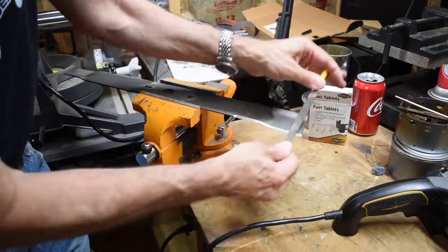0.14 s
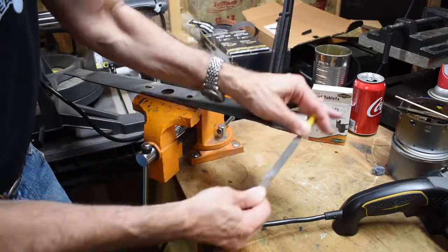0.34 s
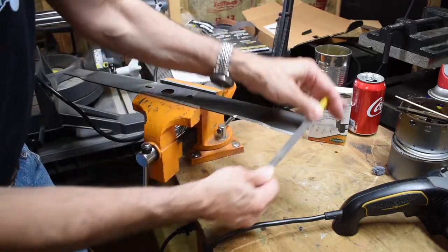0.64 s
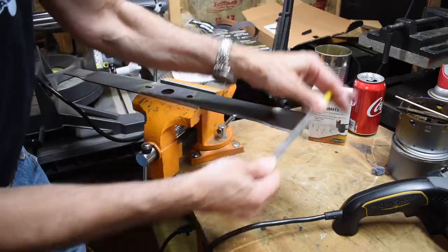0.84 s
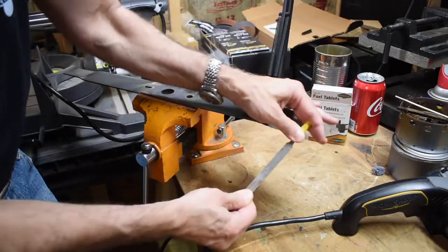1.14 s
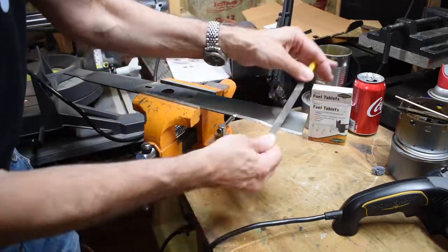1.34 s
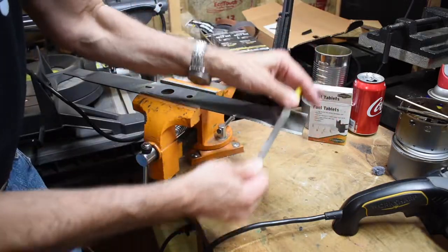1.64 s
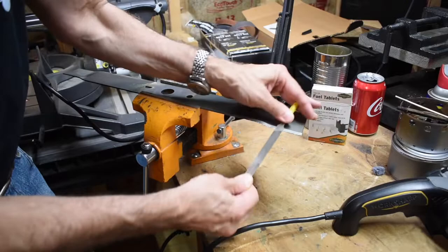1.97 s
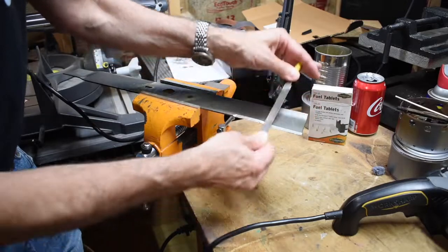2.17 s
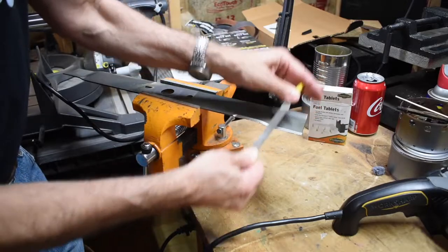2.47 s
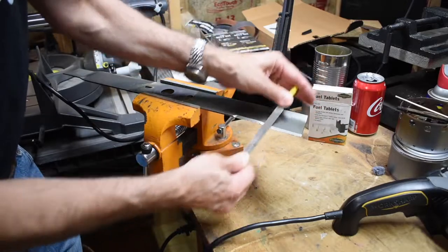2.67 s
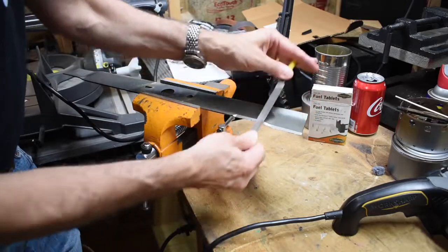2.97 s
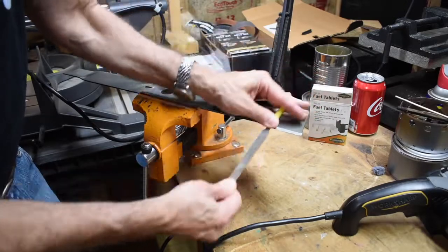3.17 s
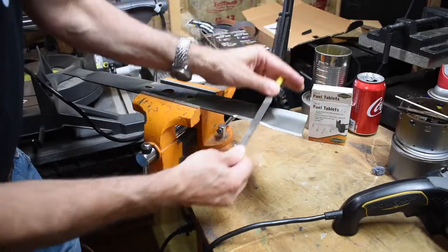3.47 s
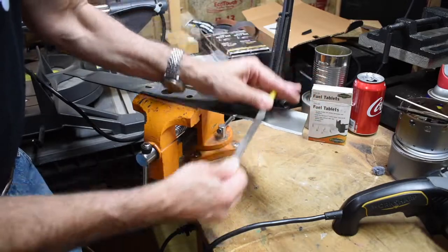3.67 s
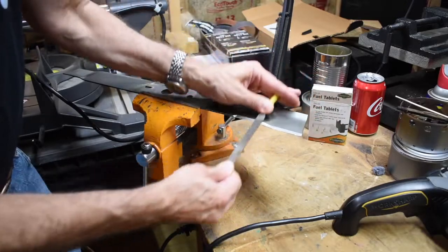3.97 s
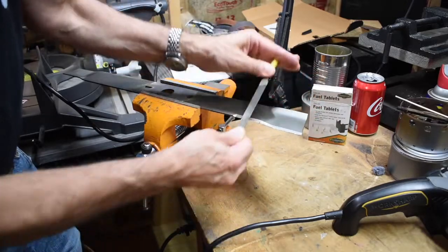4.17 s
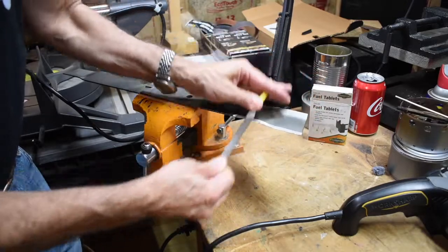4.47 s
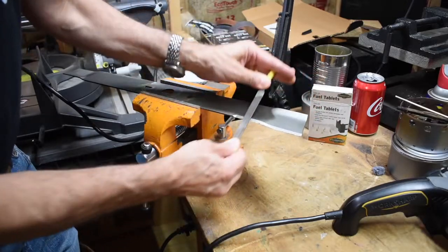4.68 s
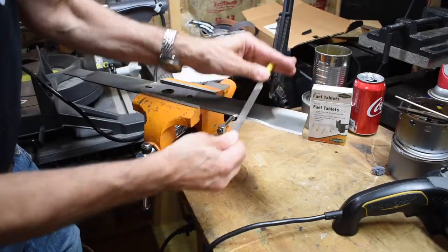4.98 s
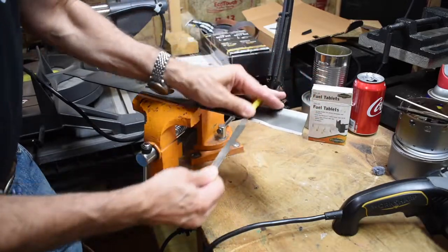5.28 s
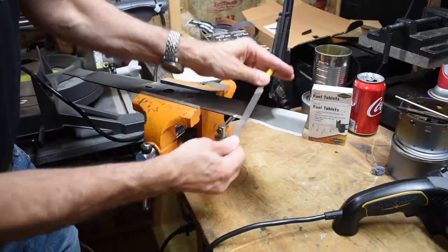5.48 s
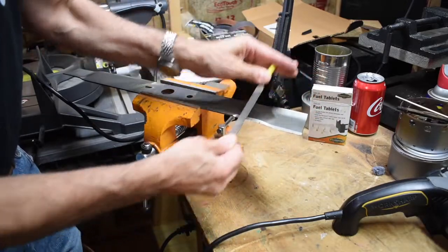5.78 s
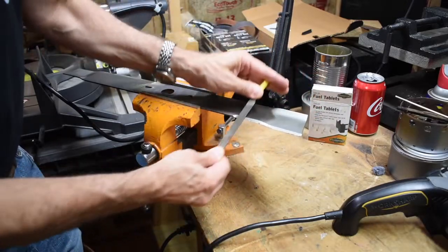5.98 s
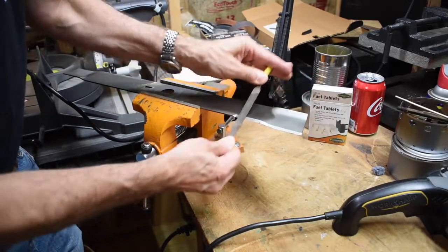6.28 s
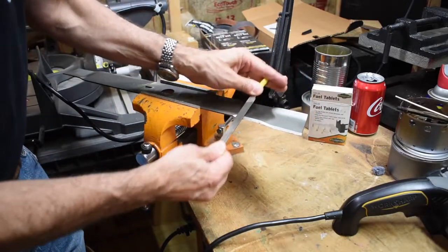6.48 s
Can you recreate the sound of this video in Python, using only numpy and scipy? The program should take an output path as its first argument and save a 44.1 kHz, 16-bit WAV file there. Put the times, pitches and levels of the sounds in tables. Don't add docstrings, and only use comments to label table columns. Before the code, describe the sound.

A hand file bites along a clamped steel blade in steady short rasping strokes, each starting with a sharp metallic clack, over faint machine hum.

```python
import sys
import numpy as np
from scipy import signal
from scipy.fft import rfft, irfft
from scipy.io import wavfile
from scipy.ndimage import uniform_filter1d, map_coordinates

SR = 44100
rng = np.random.default_rng(int(sys.argv[2]) if len(sys.argv) > 2 else 0)


def materialize(psi):
    bounded = np.clip(np.atleast_2d(psi).T, -1, 1)
    quanta = np.round(bounded * 32767).astype(np.int16)
    wavfile.write(sys.argv[1], SR, quanta)


def volts(x):
    e = np.asarray(x, float) / 20
    return 10 ** e


N = 291942
TIME = np.arange(N) / SR

# (time [s], peak level [dB], low share [dB], high share [dB], rattle length [ms])
LANDINGS = [(0.196, -4.5, -11, -8.5, 3.1), (0.226, -1, -11.5, -19, 2.8), (0.608, -2, -16.5, -10.5, 2.1),
            (0.637, -3, -14, -17.5, 8.5), (0.804, -18.5, -1, -7.5, 2.5), (1.051, -7, -12, -10.5, 4.3),
            (1.437, -9.5, -47, -1.5, 2.13), (1.857, -13, -10, -5.5, 3.1), (2.273, -5, -21.5, -5.5, 1.77),
            (2.677, -6, -30, -7.5, 2.2), (3.081, -3, -23.5, -15, 3.6), (3.512, 1.5, -25.5, -11.5, 2.34),
            (3.907, -4.5, -20, -12.5, 3.9), (4.321, 0.5, -17.5, -12.5, 3.1), (4.721, -5.5, -18, -13, 3),
            (5.136, -5.5, -18, -13, 3.3), (5.544, -1, -17, -11, 2.8), (5.952, -0.5, -23.5, -15, 2.2),
            (6.364, -7, -18, -12.5, 3.7), (6.406, -12, -1.5, -10, 1.7), (6.413, -15.5, -28, -12, 2.9),
            (6.428, -3, -28, -16, 4.5), (6.44, -12, -12, -18, 4.1), (6.532, -7, -15.5, -17, 5.2)]
RANGE_EDGES = [690, 1800, 4550]


def unit(x):
    return x / np.sqrt(np.mean(x ** 2))


def ring(x, hz, width):
    r = np.exp(-np.pi * width / SR)
    angle = 2 * np.pi * hz / SR
    return signal.lfilter([2 * (1 - r) * np.sin(angle)], [1, -2 * r * np.cos(angle), r * r], x)


def colour(x, shape):
    hz, db = np.transpose(shape)
    grid_hz = np.arange(1025) * SR / 2048
    gain_db = np.interp(np.log(grid_hz + 1), np.log(hz), db)
    cepstrum = irfft(np.log(volts(gain_db)))
    cepstrum[1:1024] *= 2
    cepstrum[1025:] = 0
    return signal.fftconvolve(x, irfft(np.exp(rfft(cepstrum))))[:N]


def walk(rate):
    k = int(SR / rate)
    steps = np.repeat(rng.standard_normal(N // k + 1), k)
    return unit(uniform_filter1d(uniform_filter1d(steps, k), k)[:N])


def split(parts):
    out = parts[-1]
    for k, hz in enumerate(RANGE_EDGES):
        low_pass = signal.butter(3, hz, fs=SR, output="sos")
        out = out + signal.sosfilt(low_pass, parts[k] - parts[k + 1])
    return out


def effort(place):
    # (teeth bite [s], file lifts [s], force at the bite [dB], half way [dB], at the lift [dB])
    strokes = [(0.0, 0.003, -45, -40, -42.5), (0.243, 0.352, -11.5, -13, -13),
               (0.654, 0.754, -13, -14.5, -16), (1.079, 1.167, -10.5, -16, -16),
               (1.46, 1.594, -26, -14, -20.5), (1.889, 2.029, -13, -16, -20),
               (2.305, 2.469, -12, -18, -30.5), (2.685, 2.775, -17, -21, -18), (2.792, 2.83, -12, -13, -17),
               (3.1, 3.238, -21, -17.5, -18), (3.529, 3.667, -16, -20, -22),
               (3.938, 4.081, -22.5, -22, -26.5), (4.355, 4.471, -17.5, -19.5, -21.5),
               (4.74, 4.885, -17, -23.5, -17.5), (5.153, 5.308, -20, -21.5, -22.5),
               (5.566, 5.691, -22.5, -18.5, -21), (5.967, 6.133, -18.5, -19, -26.5),
               (6.372, 6.4, -29, -33, -31), (6.41, 6.445, -24, -27, -17), (6.543, 6.628, -25, -17, -27)]
    seating = [-0.5, 0, 4, -0.5, -7.5, 3, 1.8, -0.1, -2.2, 0.7, 2.2, 0.5, -0.9, 0.4, -0.1, 0.1, 2.1, 4.2,
               -1.5, -7.5]
    # (at the tip [dB], near the vise [dB], gained from bite to lift [dB], added until the
    # teeth grip [dB], how closely it follows the force [0-1])
    ranges = [
        (-10, -4, -3.8, 3.5, 0.24),
        (1.5, -3, 0, -11, 0.52),
        (1.44, 0.9, 0.5, -0.4, 1.01),
        (-1.5, -3, 5, 1, 1),
    ]
    bite_db_per_s, lift_db_per_s = 654.5, 716
    usual_db, grip_s = -20, 0.0071

    gain = np.zeros((4, N))
    landings = np.r_[0, np.transpose(LANDINGS)[0]]
    tip_db, vise_db, gained_db, loose_db, follow = np.transpose(ranges)[:, :, None]
    for (bite, lift, bite_db, half_db, lift_db), seating_db in zip(strokes, seating):
        landed = landings[landings <= bite][-1]
        on = (TIME >= landed) & (TIME < lift + .09)
        t = TIME[on]
        way = np.clip((t - bite) / (lift - bite), 0, 1)
        bulge_db = 2 * half_db - bite_db - lift_db
        held_db = bite_db + (lift_db - bite_db) * way + bulge_db * 2 * way * (1 - way)
        edge_db = bite_db_per_s * np.minimum(t - bite, 0) - lift_db_per_s * np.maximum(t - lift, 0)
        share_db = tip_db + place[on] * (vise_db - tip_db) + gained_db * (way - .5)
        share_db = share_db + loose_db * np.exp(-np.maximum(t - bite, 0) / grip_s)
        share_db[:2] += seating_db
        force_db = usual_db + follow * (held_db - usual_db) + share_db + edge_db
        gain[:, on] = np.maximum(gain[:, on], volts(force_db))
    return uniform_filter1d(gain, 150, axis=1) * volts(1.42 * walk(90))


def teeth(tooth_hz, swing, jitter, scatter_db, grit):
    count = np.cumsum(tooth_hz * np.exp(swing * walk(12)) / SR)
    at = np.flatnonzero(np.diff(np.floor(count)))
    timing, strength = rng.standard_normal((N // 8, 2))[:len(at)].T
    late = (jitter * SR / tooth_hz * timing).astype(int)
    bites = np.zeros(N)
    np.add.at(bites, np.clip(at + late, 0, N - 1), volts(scatter_db * strength))
    return unit(unit(bites - bites.mean()) + grit * rng.standard_normal(N))


def patchy(x, patch_db, patch_hz, patch_s, slant):
    hz, s, z = signal.stft(x, SR, nperseg=256)
    field = rng.standard_normal((128, 1024))
    across = hz[:, None] / patch_hz + slant * np.sin(2 * np.pi * s / .9) + 40
    along = s / patch_s + 0 * hz[:, None]
    patches = map_coordinates(field, [across, along], order=1, mode="wrap")
    depth = np.clip(hz / 2500, 0, 1)[:, None]
    return signal.istft(z * volts(patch_db * depth * patches), SR)[1][:N]


def cutting(gain):
    bites = teeth(1300, swing=.35, jitter=.25, scatter_db=3.5, grit=1.2)
    chatter = patchy(bites, patch_db=3.2, patch_hz=600, patch_s=.018, slant=2.5)
    range_db = np.array([[9.], [4.], [4.], [4.5]])
    return split(gain * volts(range_db) * chatter)


def taps():
    # (time [s], peak level [dB], high share [dB], rattle length [ms])
    catches = [(0.3266, 4.5, -12, 10.5), (0.7645, 1.5, -12, 6.6), (1.1447, 6, -16, 14),
               (1.5978, 3.5, -15, 3.3), (1.884, -11, -4, 6), (1.8974, -6, -2.5, 7), (3.105, -5, -15, 19),
               (3.229, -11, -2, 7.2), (3.6294, -6, -15.5, 5.2), (3.6673, -19, -7.5, 4.8),
               (4.0854, -15, -14, 5.4), (4.4364, -3, -13, 16), (4.747, -26, -6, 2.5),
               (5.2766, -16, -6.5, 7.1), (5.977, -9, -16, 4)]
    caught = [(s, db - 10, -18, high_db, ms) for s, db, high_db, ms in catches]
    gain, t = np.zeros((4, N)), np.arange(2000) / SR
    for s, peak_db, low_db, high_db, rattle_ms in list(LANDINGS) + caught:
        i = int(s * SR)
        shape = np.exp(-(700 * t / rattle_ms) ** 1.42) * np.minimum(t / 0.00037, 1)
        range_db = np.array([[low_db + 16.5], [low_db + 15], [-5.5], [high_db + 4.5]])
        gain[:, i:i + len(t)] += volts(peak_db + range_db) * shape[:N - i]
    return split(gain * rng.standard_normal(N))


def steel(scrape, knock, place):
    # (frequency [Hz], width [Hz], level filed at the tip [dB], level filed near the vise [dB])
    blade_modes = [(332, 50, -7.5, -4), (391, 38, -24, -12), (568, 20, -24, -7), (861.7, 17, -6, -6),
                   (1137, 60, -11, -17), (1361, 63, -4, -12), (1598, 71, -16, -11.5),
                   (2204.4, 55.4, -2, -1), (2628, 103, -10.5, -6), (2820, 76, -19, -14), (3240, 60, -6, -7),
                   (3483, 142, -3.5, -8), (3730, 82, -5, -13), (3600, 47.5, -24, -6.5),
                   (4026, 66, -3.5, -11), (4180, 89, -10.5, -12.5), (5540, 270, -20.5, -22),
                   (6040, 64, -17, -21), (6060, 270, -11.5, -23.5), (6970, 240, -8, -7),
                   (7610, 110, -23, -12.5), (7750, 81, -3, -5), (8040, 220, -7.5, -32.5),
                   (8640, 230, -10, -12), (9330, 124, -7.5, -26), (10650, 310, -16, -33),
                   (10990, 210, -16, -15.5), (13400, 120, -34, -33), (10620, 86, -23, -34.5),
                   (13450, 150, -32, -34)]
    # (frequency [Hz], level [dB], time to fade by 60 dB [s])
    file_modes = [(1362, -24, .2), (2277, -16, 0.106), (4180, -27.5, 0.097), (4840, -17.5, 0.067),
                  (4960, -49, 0.09), (5809, -15, .1), (6200, -10.5, 0.09), (7830, -49, .1),
                  (9566, -46, 0.096)]
    # (frequency [Hz], level per Hz [dB])
    rasp = [(190, -35), (280, -13.5), (480, 1), (650, -29.5), (1000, -26), (1400, -7.5), (1800, -26),
            (2500, -12), (4000, -10), (5000, -4), (7500, -7.5), (10500, -10), (13500, -25.5),
            (16000, -21.5)]
    # (frequency [Hz], level per Hz [dB])
    crack = [(150, -29.5), (350, 1.5), (867, -16.5), (1740, -4.5), (2510, 11), (4040, 9.5), (4950, 1.5),
             (6900, 13), (10100, 4), (12500, 0), (16000, -16.5)]
    drift_db = 1.3

    force = scrape + volts(2.0) * knock
    blade = np.zeros(N)
    for k, (hz, width, tip_db, vise_db) in enumerate(blade_modes):
        fed_db = tip_db + place * (vise_db - tip_db) + drift_db * walk(14)
        blade += (-1) ** k * ring(force * volts(fed_db), hz, width)
    file = np.zeros(N)
    for hz, db, t60 in file_modes:
        file += ring(force * volts(db + drift_db * walk(6.2)), hz, np.log(1000) / np.pi / t60)
    pressure = uniform_filter1d(force ** 2, 500)
    recent = signal.lfilter([.0008], [1, .0008 - 1], pressure)
    free = 1 / (1 + 1.3 * pressure / (recent + 1e-12))
    modes = volts(11.5) * blade + volts(16.) * free * file
    return modes + volts(1.5) * colour(scrape, rasp) + volts(-1.0) * colour(knock, crack)


def singing(gain, place):
    # (frequency [Hz], wander [Hz], level at the tip [dB], level near the vise [dB])
    locked = [
        (571, 12, -25, -14),
        (866.4, 10, -6, -6.5),
        (1376, 44, -3, -19.5),
        (2183, 56, -8, -19),
    ]
    out = np.zeros(N)
    for hz, width, tip_db, vise_db in locked:
        force = gain[np.searchsorted(RANGE_EDGES, hz)]
        tone = unit(ring(rng.standard_normal(N), hz, width))
        out += force * volts(tip_db + place * (vise_db - tip_db)) * tone
    return out


def pings():
    # (time [s], frequency [Hz], level [dB], time to fade by 60 dB [s])
    plucks = [(.0, 5809, -42, 0.15), (.181, 6200, -37, 0.011), (.385, 9566, -29, 0.061),
              (0.391, 1362, -44, 0.3), (.805, 6210, -32, 0.15), (.805, 5200, -27, .08),
              (1.199, 1362, -40, .22), (1.615, 4835, -35, 0.084), (1.608, 8300, -41, .12),
              (3.448, 6100, -45, .012), (3.686, 4840, -36, 0.09), (4.088, 5730, -33, 0.07),
              (4.088, 4840, -42, 0.062), (4.5, 6200, -43, .08), (6.141, 6930, -37, 0.072),
              (6.455, 1365, -38, 0.25)]
    out, t = np.zeros(N), np.arange(SR // 3) / SR
    for s, hz, db, t60 in plucks:
        i = int(s * SR)
        fade = volts(db - 60 * t / t60) * np.minimum(t / 0.0013, 1)
        out[i:i + len(t)] += (fade * np.sin(2 * np.pi * hz * t))[:N - i]
    return out * volts(3 * walk(60))


def bench(scrape, place):
    push = uniform_filter1d(np.abs(scrape), 600) * volts(-6.0 + 7.6 * place)
    vise = ring(push * rng.standard_normal(N), 104.7, 40)
    table = ring(push * rng.standard_normal(N), 56.5, 16)
    return vise + volts(3.5 * place) * table


def room(x, t60, damp, wet_db):
    t = np.arange(int(.5 * SR)) / SR
    bright, dull = rng.standard_normal((2, len(t)))
    dull = signal.lfilter([.3], [1, -.7], dull)
    tail = bright * volts(-60 * t / (damp * t60)) + 0.78 * dull * volts(-60 * t / t60)
    tail = tail * (t > .004)
    return x + volts(wet_db) * signal.fftconvolve(x, tail / np.sqrt(np.sum(tail ** 2)))[:N]


def workshop():
    # (frequency [Hz], level per Hz [dB])
    fan = [(15, -52.5), (38, -35), (55, -6), (85, -9.5), (175, -9.5), (250, -14.5), (390, -19), (800, -18),
           (1500, -21), (2000, -27), (3400, -23.5), (5000, -32), (6000, -35), (16000, -47.5)]
    # (frequency [Hz], width [Hz], rms level [dB])
    hum = [
        (57.8, 14, -60),
        (108.7, 7.3, -64.5),
        (168.9, 3.3, -52.5),
        (381, 13, -62),
        (1070, 15, -61.5),
        (1350, 15, -90.5),
        (1590, 10, -63.5),
    ]
    air = volts(-45.5 + 1.1 * walk(2.83)) * unit(colour(rng.standard_normal(N), fan))
    mains_hz = 58.6
    out = air + volts(-43.5 + 1.27 * walk(5)) * np.sin(2 * np.pi * mains_hz * TIME)
    for hz, width, db in hum:
        out += volts(db) * unit(ring(rng.standard_normal(N), hz, width))
    return out


def scene():
    # (time [s], place from 0 at the tip to 1 near the vise)
    path = [
        (0, 0.082),
        (1.2, 0.26),
        (2., 0.39),
        (3., 0.57),
        (4., 1),
        (5., 0.96),
        (6.6, 0.93),
    ]
    place = np.interp(TIME, *np.transpose(path))
    gain = effort(place)
    scrape = cutting(gain)
    near = steel(scrape, taps(), place) + singing(gain, place) + pings()
    return (room(near, t60=0.11, damp=0.4, wet_db=-9.5) + bench(scrape, place) + workshop())[None]


def band_limit(x):
    return signal.sosfilt(signal.butter(12, 16360, fs=SR, output="sos"), x)


def record(dry):
    top = signal.ellip(12, .2, 70, 15900, fs=SR, output="sos")
    bass = signal.butter(2, 41.8, "high", fs=SR, output="sos")
    heard = signal.sosfilt(np.r_[bass, top], dry)
    return band_limit(np.clip(heard, -.97, .97))


dry = scene()
out = record(dry)
materialize(out)
```